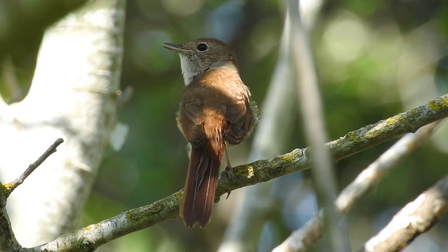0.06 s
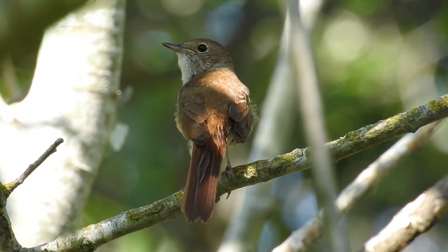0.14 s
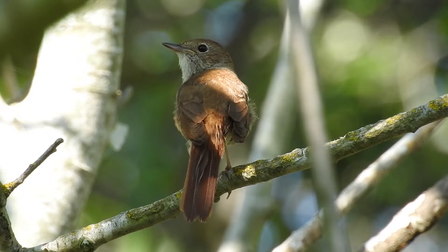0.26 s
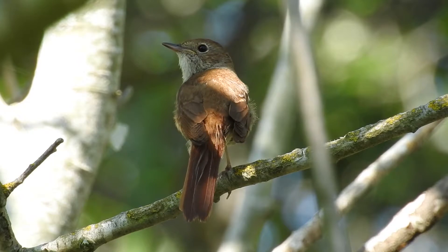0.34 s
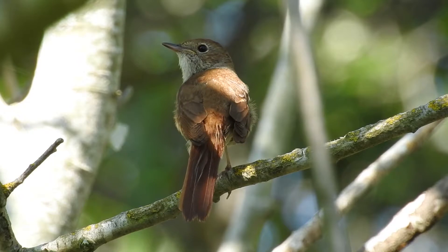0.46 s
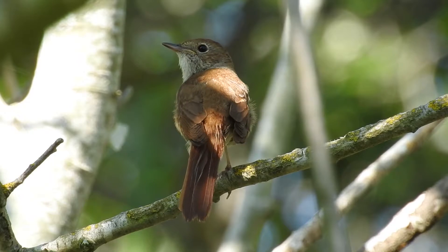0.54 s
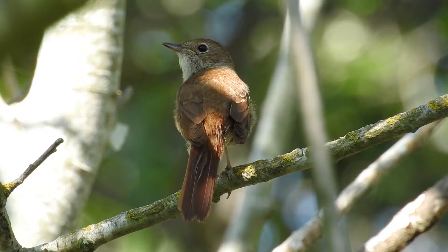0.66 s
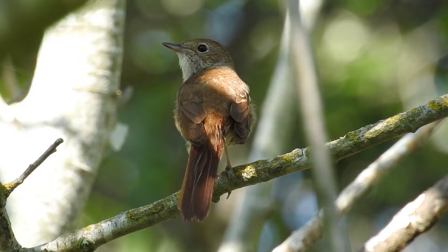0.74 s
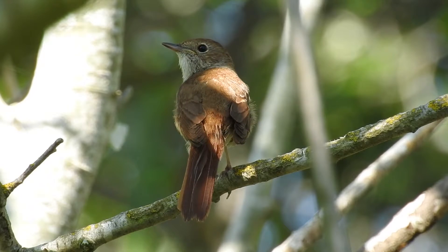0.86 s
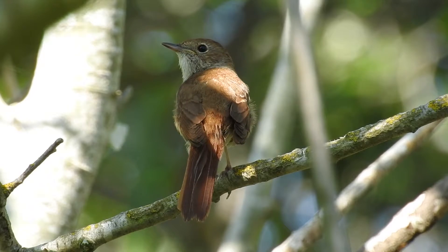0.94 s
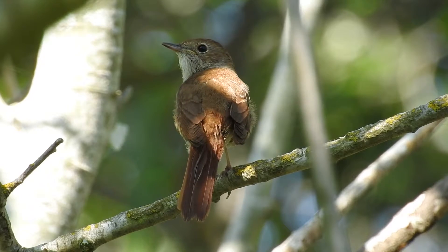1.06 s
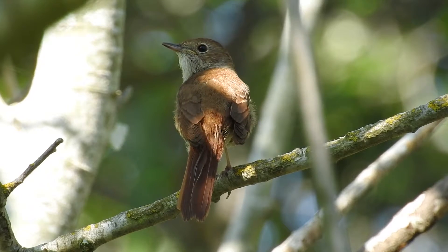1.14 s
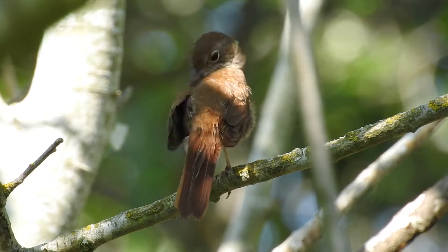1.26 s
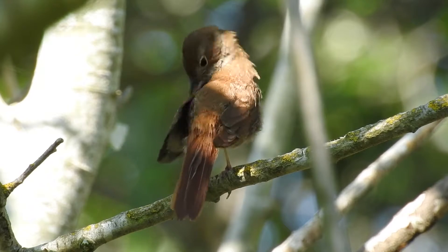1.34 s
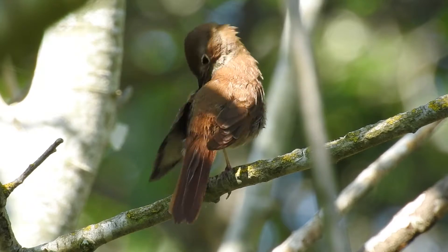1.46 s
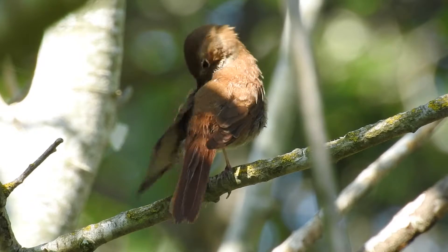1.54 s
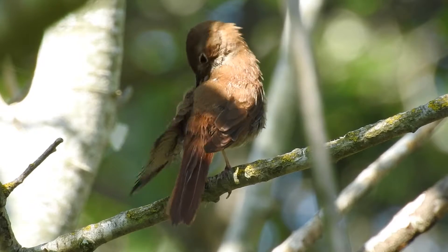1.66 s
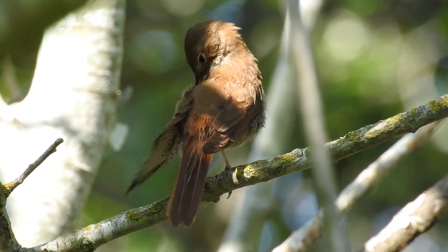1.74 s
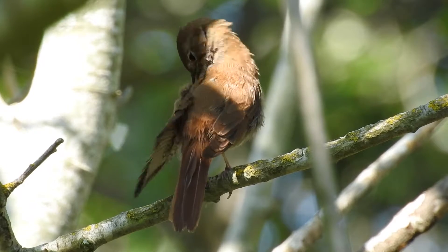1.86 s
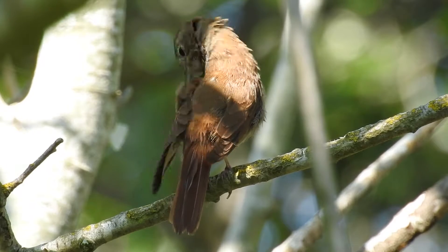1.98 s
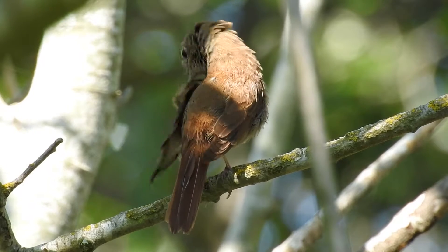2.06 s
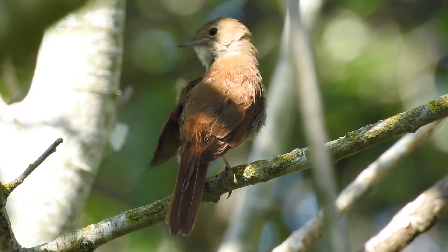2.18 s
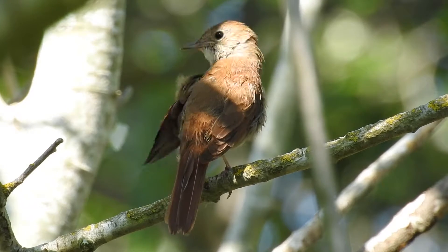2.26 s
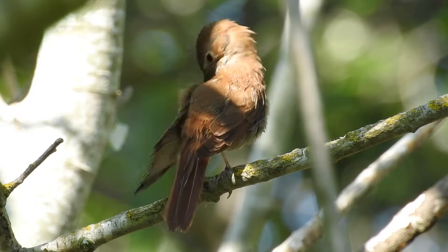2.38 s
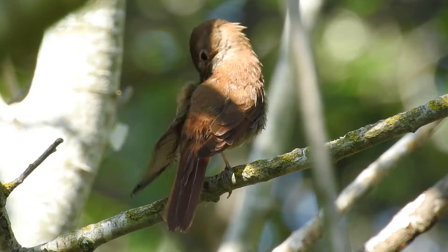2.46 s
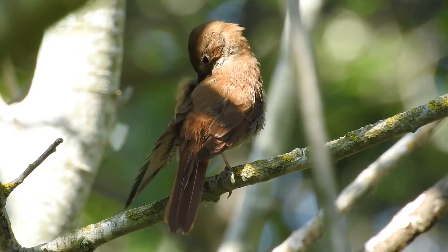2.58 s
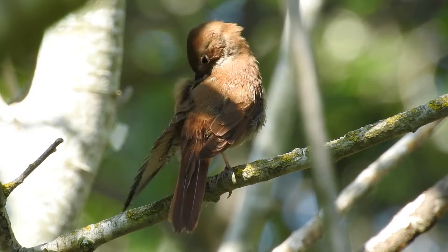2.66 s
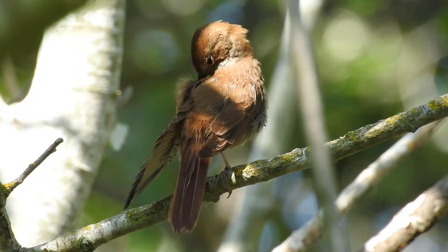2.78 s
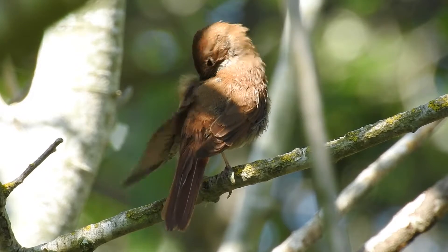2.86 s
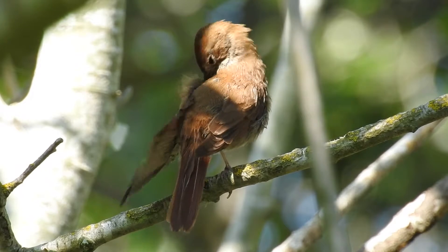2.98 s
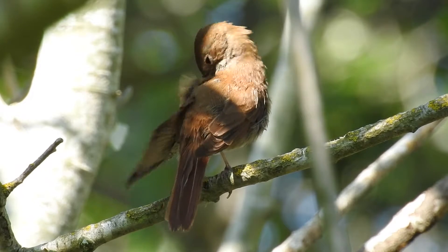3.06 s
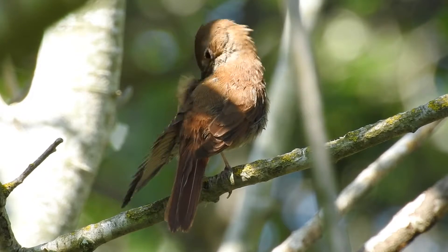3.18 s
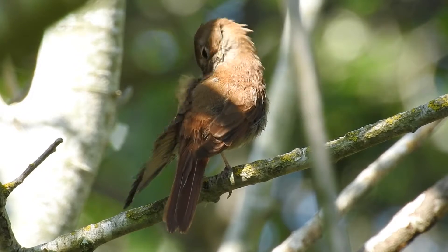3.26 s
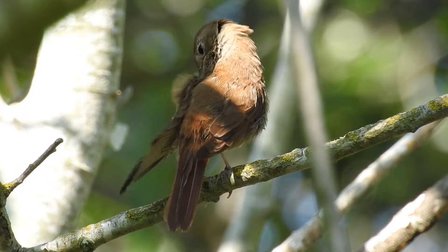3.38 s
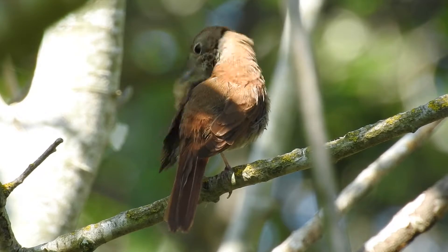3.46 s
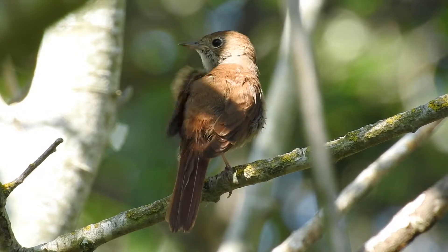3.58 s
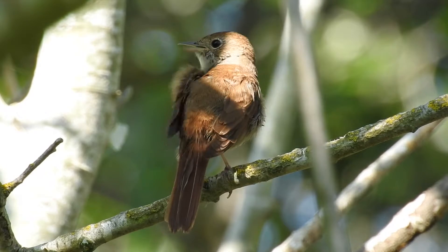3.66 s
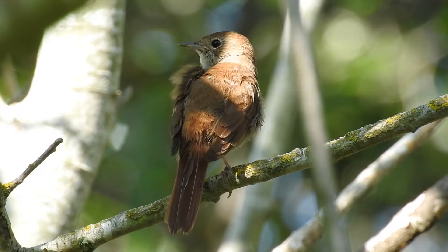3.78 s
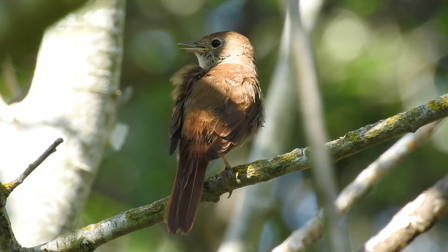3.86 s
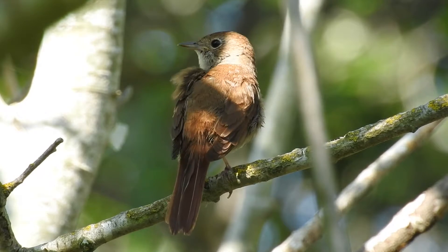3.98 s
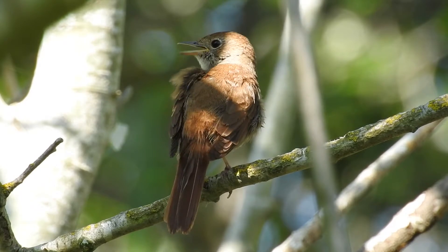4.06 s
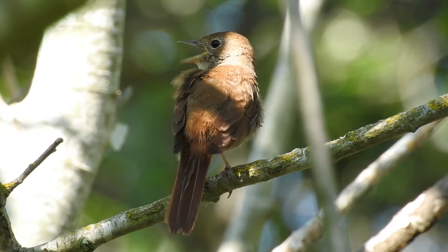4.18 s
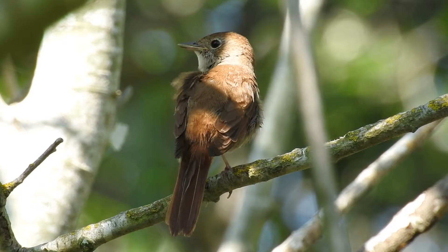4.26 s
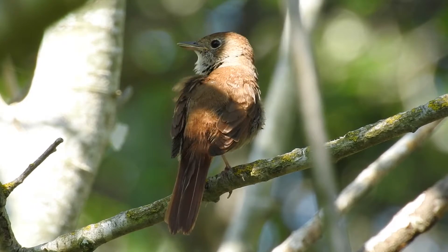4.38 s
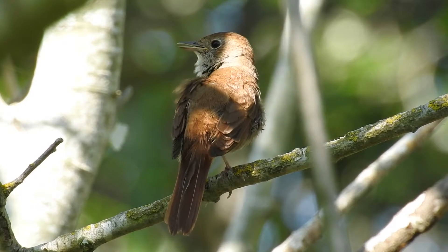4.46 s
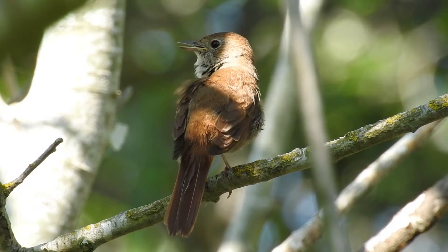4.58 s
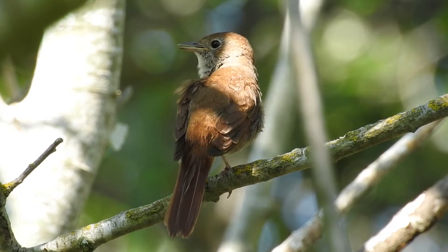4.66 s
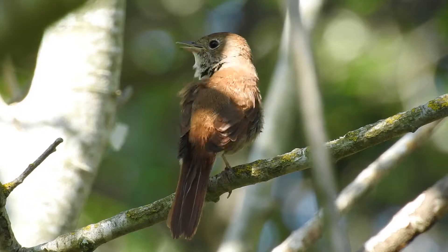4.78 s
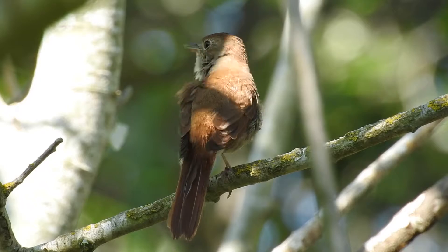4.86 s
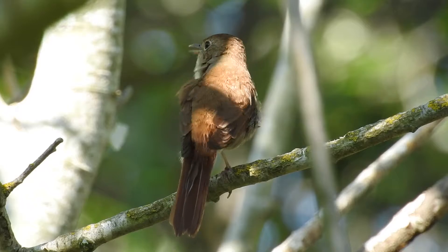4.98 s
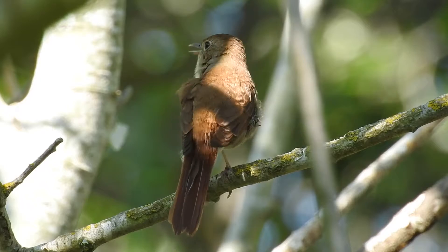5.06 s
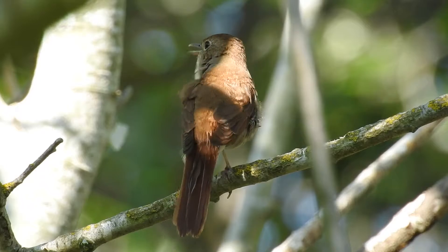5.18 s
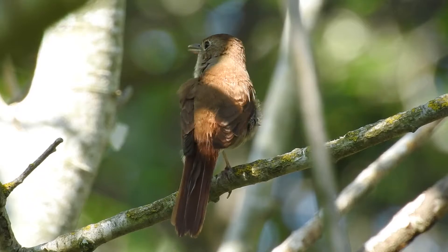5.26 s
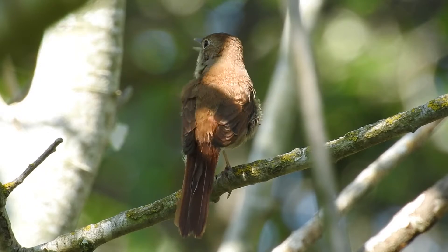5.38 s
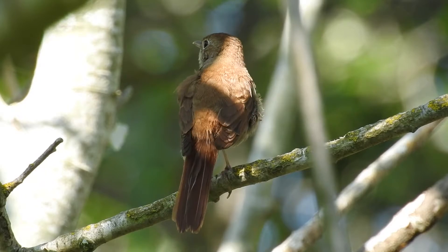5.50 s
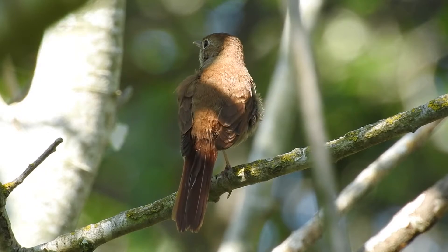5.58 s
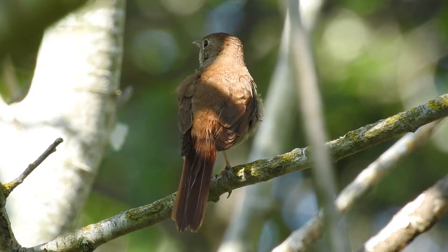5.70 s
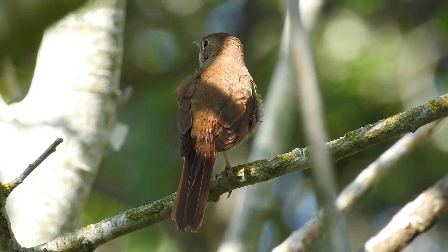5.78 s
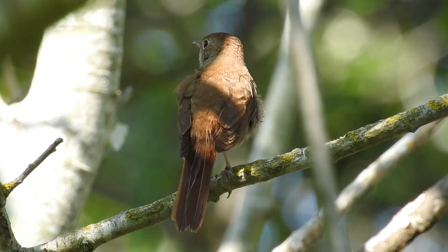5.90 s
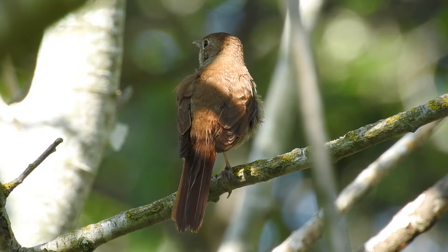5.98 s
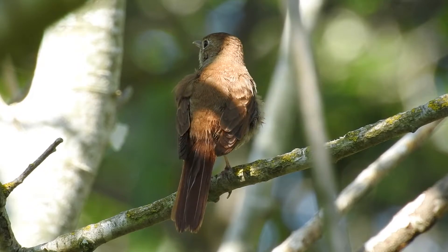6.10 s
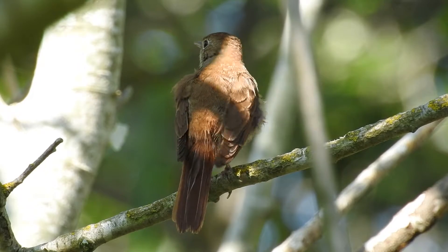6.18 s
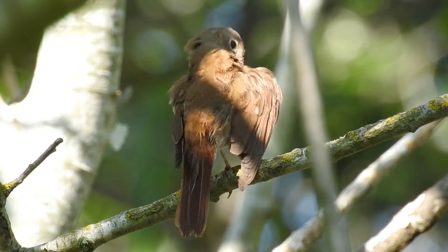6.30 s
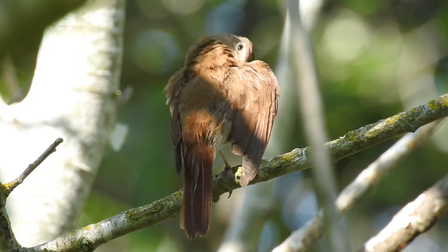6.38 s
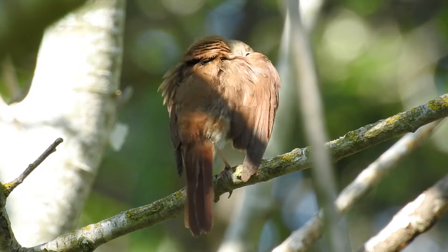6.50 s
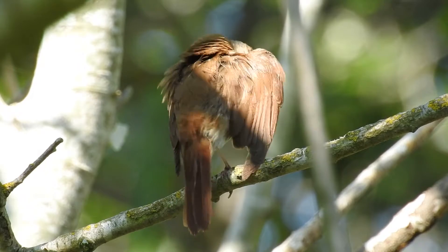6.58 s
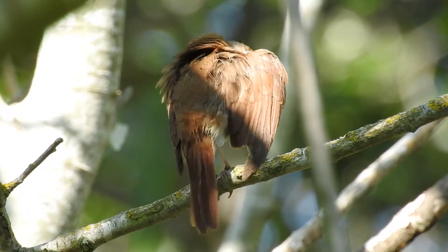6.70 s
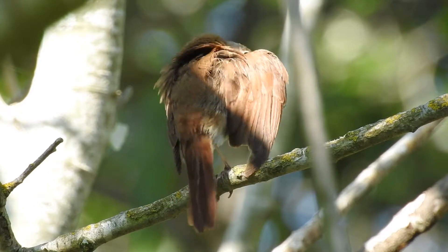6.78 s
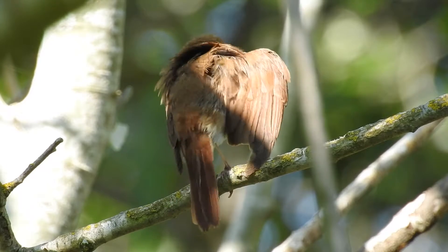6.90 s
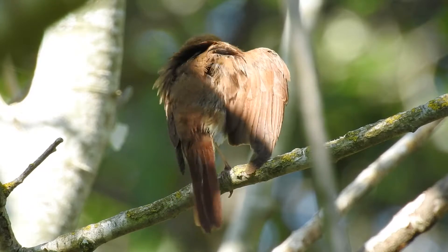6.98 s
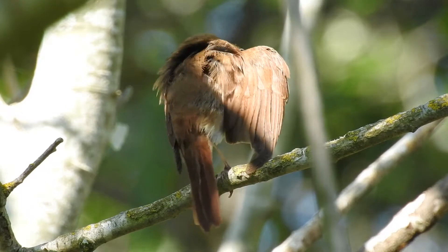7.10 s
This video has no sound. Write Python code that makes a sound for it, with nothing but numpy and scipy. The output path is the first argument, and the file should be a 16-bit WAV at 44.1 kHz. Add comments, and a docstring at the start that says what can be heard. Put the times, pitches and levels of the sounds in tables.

```python
"""A nightingale ends one phrase with falling double chirps and, after a pause, sings another: a high whistle,
a rising whip, a soft rattle and four falling sweeps with low hooks between; gliding sines and paired clicks.
A warbler chatters in fluttering tones and churrs in puffs of noise; wandering sines make far small birds.
A pigeon coos in low bending tones with a hoarse throb. Every call goes through decaying-noise echoes from
the trunks, over the hush of the wood: shaped stereo noise."""
import sys
import numpy as np
from scipy import signal
from scipy.fft import rfft, irfft, next_fast_len
from scipy.io import wavfile
from scipy.ndimage import uniform_filter1d, minimum_filter1d, map_coordinates

SR = 44100
rng = np.random.default_rng(int(sys.argv[2]) if len(sys.argv) > 2 else 0)


def master_out(mix):
    """Clip the mix to full scale and print it as 16-bit PCM to the path in sys.argv[1]."""
    frames = np.transpose(np.atleast_2d(mix))
    ceiling = np.clip(frames, -1, 1)
    pcm = np.round(ceiling * 32767).astype(np.int16)
    wavfile.write(sys.argv[1], SR, pcm)


N = 314874


def amp(db):
    """Decibels to linear gain."""
    return 10 ** (np.asarray(db) / 20)


def unit(x):
    """Scales to an RMS of one."""
    return x / np.sqrt(np.mean(x ** 2) + 1e-20)


def along(points, hz):
    """Reads a curve of (Hz, value) points on a log frequency axis."""
    f, v = np.transpose(points)
    return np.interp(np.log(hz + 1), np.log(f + 1), v)


def add(bed, sound, s):
    """Mixes a stereo sound in at time s; what falls before zero is left out."""
    start = round(s * SR)
    sound = sound[:, max(-start, 0):]
    part = bed[:, max(start, 0):][:, :sound.shape[1]]
    part += sound[:, :part.shape[1]]


def wobble(size, rate):
    """A smooth random curve, rate knots a second."""
    knots = rng.standard_normal(int(size * rate / SR) + 4)
    return map_coordinates(knots, [np.arange(size) * rate / SR])


def filtered(x, response):
    """Shapes the spectrum of x by a response of frequency."""
    m = next_fast_len(N + 8192)
    return irfft(rfft(x, m) * response(np.fft.rfftfreq(m, 1 / SR)), m)[..., :N]


BREATHY = .7  # share of flutter in the third harmonic


def gliding_tone(rows, octave, twelfth, edge):
    """A sine gliding through (s, Hz, dB) rows, with second and third harmonics at dB given by their own
    pitch; it fades in and out over edge seconds."""
    s, hz, db = np.transpose(rows)
    t = np.arange(s[0], s[-1], 1 / SR)
    pitch = np.interp(t, s, hz)
    phase = 2 * np.pi * np.cumsum(pitch) / SR
    breath = 1 - BREATHY + BREATHY * wobble(len(t), 2500)
    tone = np.sin(phase) + amp(octave(2 * pitch)) * np.sin(2 * phase)
    tone += amp(twelfth(3 * pitch)) * np.sin(3 * phase) * breath
    nearest_end = np.minimum(t - s[0], s[-1] - t)
    fade = np.sin(np.pi / 2 * np.clip(nearest_end / edge, 0, 1)) ** 2
    return tone * amp(np.interp(t, s, db)) * fade


def glide(s, length, start_hz, end_hz, bend, db, shape):
    """(s, Hz, dB) rows of one note; bend maps the share of its length to the share of its pitch change."""
    u = np.linspace(0, 1, num=16)
    hz = start_hz + (end_hz - start_hz) * bend(u)
    return np.transpose([s + length * u, hz, db + np.interp(u, *np.transpose(shape))])


# second harmonic by its own pitch: [f/Hz, level/dB re fundamental]
THROAT = [(3000, -23), (5000, -23.5), (6300, -20), (8000, -26.5), (9300, -32), (10000, -59.5), (14000, -54)]
# third harmonic by its own pitch: [f/Hz, level/dB re fundamental]
TWELFTH = [(6000, -36), (11500, -35.5), (13000, -47), (15000, -59)]
DRIER_DB = -1.5  # the first phrase carries less echo than the second


def nightingale():
    """Clear whistled notes from a throat that adds weak overtones, and a rattle of paired clicks."""
    out = rattle()
    for note in song():
        start = note[0][0]
        tone = gliding_tone(note, lambda hz: along(THROAT, hz), lambda hz: along(TWELFTH, hz), edge=0.0022)
        wet_db = 1.0 + DRIER_DB * (start < 1)
        add(out, in_wood(tone, wet_db, width=0.38, near_db=7.5), start)
    return out


# high whistle: [t/s, f/Hz, level/dB]
WHISTLE = [(4.275, 6730, -39.5), (4.31, 6800, -23), (4.334, 7006, -16.5), (4.345, 6780, -31),
           (4.365, 6900, -37)]
# rising whip: [t/s, f/Hz, level/dB]
WHIP = [(4.387, 3260, -38.5), (4.416, 4964, -8.5), (4.425, 5130, -16.5), (4.435, 4745, -9)]


def song():
    """Every whistled note, each a list of (s, Hz, dB) rows for its pitch and level."""
    return [WHISTLE, WHIP] + double_chirps() + falling_sweeps() + low_hooks()


# double chirps: [t/s, top f/Hz, level/dB before the chirp's shape]
CHIRPS = [(-.19, 4300, -11.5), (.004, 3955, -11), (.197, 4020, -11)]
# level shape of the first chirp: [share of the chirp, level/dB]
CHIRP_LEVEL = [(0, -0.5), (.25, -1), (.55, -0.5), (.8, -5.5), (1, -9)]
# level shape of the second chirp: [share of the chirp, level/dB]
SECOND_LEVEL = [(0, 2), (.2, 1.7), (.6, -4), (1, -16)]
CHIRP_S, CHIRP_FLOOR_HZ, CHIRP_BEND = .029, 2553, 1.9
SECOND_AFTER_S, SECOND_S, SECOND_DB = .039, .036, -2  # dB relative to the first
SECOND_TOP_HZ, SECOND_FLOOR_HZ, SECOND_BEND = 3820, 2140, 1.2


def double_chirps():
    """The first chirp slows as it falls; the second falls straighter and lower."""
    notes = []
    for s, hz, db in CHIRPS:
        notes.append(glide(s, CHIRP_S, hz, CHIRP_FLOOR_HZ, lambda u: 1 - (1 - u) ** CHIRP_BEND,
                           db, CHIRP_LEVEL))
        notes.append(glide(s + SECOND_AFTER_S, SECOND_S, SECOND_TOP_HZ, SECOND_FLOOR_HZ,
                           lambda u: 1 - (1 - u) ** SECOND_BEND, db + SECOND_DB, SECOND_LEVEL))
    return notes


# falling sweeps: [t/s, top f/Hz, level/dB before the sweep's shape]
SWEEPS = [(4.941, 4320, -10.5), (5.143, 4200, -9.5), (5.342, 4536, -8.5), (5.543, 4695, -7)]
# level shape of a sweep: [share of the sweep, level/dB]
SWEEP_LEVEL = [(0, -19.5), (.13, -6.5), (.36, -4.5), (.6, -1.1), (.8, -5), (1, -19.5)]
SWEEP_S, SWEEP_FLOOR_HZ, SWEEP_BEND = .065, 1960, 1.55


def falling_sweeps():
    """The pitch lingers at the top, then drops ever faster."""
    return [glide(s, SWEEP_S, hz, SWEEP_FLOOR_HZ, lambda u: u ** SWEEP_BEND, db, SWEEP_LEVEL)
            for s, hz, db in SWEEPS]


# low hooks between chirps and sweeps: [t/s, held f/Hz, level/dB, change over the hold/dB]
HOOKS = [(.105, 1621, -27.5, -21), (5.034, 1914, -21.5, -0.5), (5.238, 2050, -21.5, 4),
         (5.441, 1902, -21.5, -2.5)]
HOOK_S, SCOOP_S, SCOOP_DB = 0.044, 0.015, -24
SCOOP_FROM, HOOK_SAG = 0.71, 0.92  # first and last pitch as shares of the held pitch
HOOK_END_S, HOOK_END_DB = .01, -15


def low_hooks():
    """A quick scoop up to a short held tone, which sags and dies at the end."""
    notes = []
    for s, hz, db, change_db in HOOKS:
        held_db = db + change_db
        notes.append([(s, SCOOP_FROM * hz, db + SCOOP_DB),
                      (s + SCOOP_S, hz, db),
                      (s + HOOK_S - HOOK_END_S, hz, held_db),
                      (s + HOOK_S, HOOK_SAG * hz, held_db + HOOK_END_DB)])
    return notes


# first and last click of the rattle, before random scatter: [t/s, relative level/dB, f/Hz]
RATTLE = [(4.56, -46, 1620), (4.828, -30.5, 2050)]
RATTLE_CLICKS = 11


def rattle():
    """Pairs of short damped sines, growing louder and higher."""
    out, t = np.zeros((2, N)), np.arange(SR // 100) / SR
    scatter = rng.standard_normal((RATTLE_CLICKS, 3)) * [.001, 1.2, 70]  # s, dB, Hz
    for s, db, hz in np.linspace(*RATTLE, RATTLE_CLICKS) + scatter:
        burst = t / 0.001 * np.exp(-t / 0.00091)
        click = amp(db + 12.5) * np.sin(2 * np.pi * hz * t) * burst
        pair = np.pad(click, (0, 250)) + 1.03 * np.pad(click, (250, 0))  # second click 250 samples later
        add(out, in_wood(pair, wet_db=1, width=.35, near_db=4), s)
    return out


# warbler notes: [t/s, length/s, start f/Hz, end f/Hz, level/dB before flutter, octave level/dB re note]
WARBLER = [ (1.16, .074, 2720, 2680, -50.5, -8), (1.259, 0.012, 3040, 2940, -42, -10),
           (1.305, .011, 3050, 3080, -41, -4), (1.356, .013, 2910, 3050, -50, 10.5),
           (1.438, 0.018, 3290, 3200, -43, -3.5), (1.55, 0.0126, 4170, 4270, -41.5, -13),
           (1.666, 0.053, 7750, 7630, -48.5, -30), (1.679, 0.063, 3304, 3200, -43.5, -2.5),
           (1.811, 0.037, 2810, 3286, -42, 10), (1.872, 0.0226, 4230, 5800, -44, -30),
           (1.984, 0.027, 3530, 3850, -38.5, -8.5), (2.041, 0.0258, 2770, 3116, -39.5, -9),
           (2.095, 0.028, 5010, 5100, -47, -20), (2.148, .06, 7800, 7700, -51, -28.5),
           (2.164, .067, 6660, 6470, -48.5, -30), (3.672, 0.041, 1756, 1620, -46.5, -18),
           (3.722, 0.032, 3940, 3920, -40, -31), (3.748, 0.091, 3940, 2603, -41.5, -29),
           (3.875, .011, 2640, 3002, -36.5, 5.5), (3.885, .03, 7860, 7560, -52, -18),
           (4.023, 0.027, 3350, 3170, -43.5, -4), (4.077, 0.017, 3790, 3775, -37.5, -18),
           (4.115, .015, 3626, 3710, -31.5, -37), (4.109, 0.062, 2356, 2304, -42, -9),
           (4.145, .032, 3692, 3430, -34.5, -36.5), (4.651, 0.029, 2896, 2868, -43, 5),
           (4.806, 0.018, 2616, 3450, -41.5, 10.5), (4.879, 0.075, 3840, 3000, -41.5, -12.5), ]
BUZZ = 0.57  # share of flutter in a note


def warbler():
    """Short scratchy notes: a fast random flutter roughens each tone."""
    out = np.zeros((2, N))
    for s, length, hz, end_hz, db, octave_db in WARBLER:
        rows = [(s, hz, db), (s + length, end_hz, db)]
        note = gliding_tone(rows, lambda _: octave_db, lambda _: -26, edge=0.0016)
        flutter = 1 - BUZZ + BUZZ * wobble(len(note), 1100)
        add(out, in_wood(note * flutter, wet_db=-3.5, width=0.32, near_db=1.0), s)
    return out


# churr puffs of the warbler: [t/s, relative level/dB]
CHATTER = [(1.217, -46.5), (1.258, -41), (1.3038, -39), (1.358, -37.5), (1.4404, -46), (1.493, -37.5),
           (1.5521, -37.5), (1.6781, -35.5), (1.74, -36.5), (1.878, -32), (1.971, -38), (2.14, -41),
           (2.1997, -45), (3.022, -40), (3.8794, -42.5), (3.9764, -41), (4.0345, -40), (4.0735, -35.5),
           (4.114, -43), (4.1575, -40), (4.194, -37), (4.2698, -35.5), (4.3263, -33), (4.5113, -28),
           (4.6603, -28.5), (4.706, -34.5), (4.8096, -32.5), (4.8797, -35)]
# colour of the churr noise: [f/Hz, relative level/dB]
CHURR = [(1500, -35), (2200, -7.5), (3200, -7), (4500, -3), (6200, 1.5), (7000, -7.5), (10000, -38),
         (14000, -40)]


def chatter():
    """The warbler's harsh churrs: short puffs of wide rasping noise."""
    out, t = np.zeros((2, N)), np.arange(SR // 20) / SR
    rasp = unit(filtered(rng.standard_normal(N), lambda hz: amp(along(CHURR, hz))))
    envelope = np.exp(-t / 0.012) * (1 - np.exp(-t / 0.0016))
    for s, db in CHATTER:
        puff = amp(db - 5.5) * envelope * rasp[round(s * SR):][:len(t)]
        add(out, in_wood(puff, wet_db=0.5, width=0.47, near_db=-20.0), s)
    return out


# phrases of far small birds: [start t/s, end t/s, centre f/Hz, relative level/dB]
TWITTER = [ (0.79, 0.985, 3960, -57.5), (0.963, 1.166, 4890, -51.5), (1.195, 1.955, 6120, -59.5),
           (2.338, 2.602, 4630, -60.5), (2.602, 2.983, 4810, -52), (2.705, 2.966, 3570, -60.5),
           (2.993, 3.292, 4746, -59), (3.197, 3.284, 3117, -58), (3.458, 3.624, 3840, -58.5),
           (3.909, 4.315, 6100, -62), (4.439, 4.946, 5760, -61), (6.165, 6.342, 4100, -55.5),
           (6.319, 6.44, 3000, -60.5), (6.752, 6.99, 4110, -53.5), ]
WANDER_HZ = 499  # spread of the pitch curve's random knots


def twitter():
    """Six quick wandering warbles at once, so far away that the echoes outweigh them."""
    out = np.zeros((2, N))
    for s, end, hz, db in TWITTER:
        size = round((end - s) * SR)
        voices = np.zeros(size)
        for _ in range(6):
            pitch = hz + WANDER_HZ * wobble(size, 70)
            pulse = np.clip(0.84 + wobble(size, 45.7), 0, 2)
            voices += np.sin(2 * np.pi * np.cumsum(pitch) / SR) * pulse
        phrase = amp(db - 5.5) * voices * np.hanning(size) ** 0.17
        add(out, in_wood(phrase, wet_db=3.0, width=0.52, near_db=24), s)
    return out


# coos: [t/s, length/s, start f/Hz, end f/Hz, level/dB before the throb, loudest at this share of the coo]
COOS = [(0.022, .06, 400, 520, -44, 0.43), (.43, .11, 523, 430, -50.5, 0.79),
        (.68, 0.23, 390.7, 461, -47.5, 0.79), (.96, 0.21, 490, 362, -43, 0.72),
        (1.38, 0.18, 505.7, 428, -46, 0.84), (1.56, 0.11, 429, 445, -48.5, 0.68),
        (1.71, 0.24, 524, 423, -43, 0.76), (2.07, .12, 432, 508, -38.5, 0.64),
        (2.2, .12, 464, 443, -43.5, 0.85), (2.56, 0.068, 373, 504, -45.5, 0.47),
        (2.63, .13, 500, 450, -55, .3), (2.92, 0.073, 490, 334, -46.5, 0.44),
        (5.1, .2, 467.8, 478, -51, 0.54), (5.37, .11, 492.5, 456, -37.5, .65),
        (5.67, .54, 485, 449.3, -41, 0.21), (6.48, 0.21, 512, 457, -45.5, 0.8)]
COO_BEND = 1.74  # the pitch moves most near the end
COO_RISE_DB, COO_FALL_DB, COO_WAVER_HZ = -10, -11, 13


def pigeon():
    """Hollow low coos that swell and sink; the longer ones throb more hoarsely."""
    out = np.zeros((2, N))
    for s, length, hz, end_hz, db, peak in COOS:
        swell = [(0, COO_RISE_DB), (peak, 0), (1, COO_FALL_DB)]
        rows = glide(s, length, hz, end_hz, lambda u: u ** COO_BEND, db, swell)
        rows = rows + np.outer(rng.standard_normal(len(rows)), [0, COO_WAVER_HZ, 0])
        tone = gliding_tone(rows, lambda _: -36, lambda _: -40, edge=0.0019)
        hoarse = 1 + min(2.2 * length, 1.2) * wobble(len(tone), 100)
        add(out, in_wood(tone * hoarse, wet_db=-5.0, width=.2, near_db=6), s)
    return out


# ring of the trunks: [f/Hz, time to fall 60 dB/s]
TRUNKS = [(400, 0.68), (2000, 0.62), (4000, 0.57), (6000, 0.64), (7200, 0.7), (12000, 0.061)]
# thin trunks throw back the middle treble best: [f/Hz, relative level/dB]
SCATTER = [(400, -6), (1600, -13), (2100, -9), (2800, 0), (5000, -1), (6900, -7), (12000, -2)]


def in_wood(x, wet_db, width, near_db):
    """The direct sound, quick answers from near branches and a long tail from the trunks, all of decaying
    noise; one big tree sends a late single echo."""
    hz, t, z = signal.stft(rng.standard_normal((2, SR * 3 // 4)), SR, nperseg=256)
    trunks = amp(-60 * t / along(TRUNKS, hz)[:, None])
    branches = amp(near_db - 60 * t / 0.13)
    colour = amp(along(SCATTER, hz))[:, None]
    mid, side = signal.istft(z * (trunks + branches) * colour, SR, nperseg=256)[1]
    onset = 1 - np.exp(-np.arange(len(mid)) / SR / .003)
    onset = onset * amp(2 * wobble(len(mid), 90))  # trunks stand unevenly, so the echoes come in clumps
    stereo = np.array([mid + width * side, mid - width * side])
    answer = amp(wet_db) * onset * stereo / np.linalg.norm(mid)
    answer[:, 0] = 1  # direct sound
    late_echo = amp(-36) * np.hanning(44) * np.sin(2 * np.pi * 2600 * np.arange(44) / SR)
    answer[:, round(.128 * SR):][:, :44] += late_echo
    return signal.fftconvolve(x[None], answer, axes=1)


# colour of the hush: [f/Hz, relative level/dB]
HUSH = [(20, -46.5), (55, 6), (125, -5), (200, -3), (270, -9.5), (450, -5), (900, -11.5), (2200, -15),
        (3300, -14.5), (6500, -14.5), (7500, -21), (10000, -26.5), (13000, -32), (15000, -40)]
# left-right likeness of the hush: [f/Hz, correlation]
ALIKE = [(60, 0.99), (180, 0.68), (540, 0.89), (1600, 0.76), (4790, 0.11), (14300, 0.074)]
HUSH_DB = -48.5  # RMS before the slow swell


def hush():
    """Far rumble and leaves: stereo noise with faint patches in time and pitch, and a slow swell."""
    z = signal.stft(rng.standard_normal((2, N)), nperseg=512)[2]
    field = rng.standard_normal(z.shape[1:])
    field = uniform_filter1d(uniform_filter1d(field, 6, 0), 14, 1)
    # the rumble is steadier than the leaves
    depth_db = np.clip(np.arange(len(field)) / 8, .2, 1)[:, None] * 2.55
    pair = signal.istft(z * amp(depth_db * unit(field)), nperseg=512)[1][:, :N]

    def mid_side_response(hz):
        angle = np.arccos(np.clip(along(ALIKE, hz), -1, 1)) / 2  # sets the left-right likeness
        return amp(along(HUSH, hz)) * [np.cos(angle), np.sin(angle)]

    mid, side = filtered(pair, mid_side_response)
    swell_db = .8 * wobble(N, 1.6)
    return amp(HUSH_DB + swell_db) * unit(np.array([mid + side, mid - side]))


def scene():
    """The nightingale in front, the other birds farther off, the hush behind."""
    return nightingale() + warbler() + chatter() + twitter() + pigeon() + hush()


CEILING, TOP_HZ = .78, 14950  # limiter threshold (linear) and band limit


def record(dry):
    """A quick limiter holds the loudest peaks, the right side sits a little louder, and the treble is cut."""
    need = np.minimum(1, CEILING / (np.abs(dry).max(0) + 1e-9))
    gain = uniform_filter1d(minimum_filter1d(need, size=265), size=133)  # samples: hold, then smooth
    balance = amp([[-.15], [.15]])  # left, right
    return filtered(dry * gain * balance, lambda hz: hz < TOP_HZ)


dry = scene()
out = record(dry)
master_out(out)
```